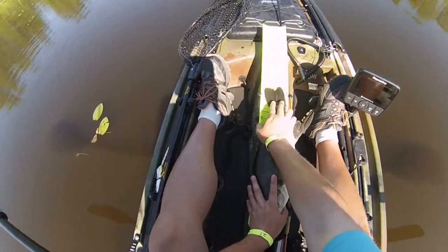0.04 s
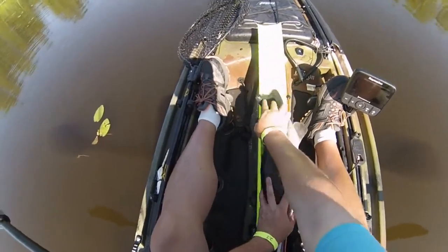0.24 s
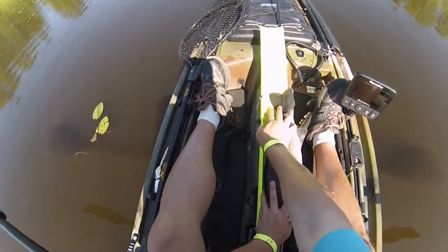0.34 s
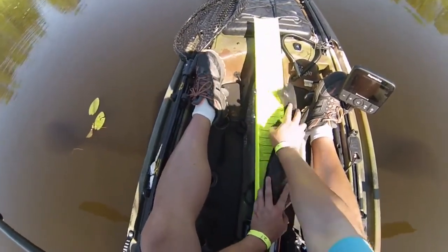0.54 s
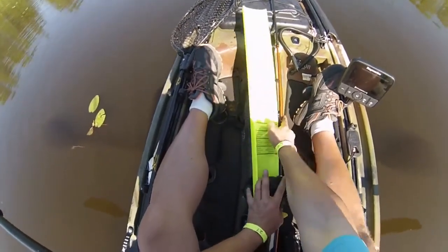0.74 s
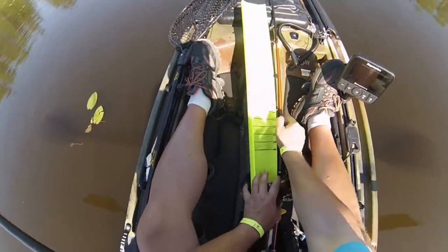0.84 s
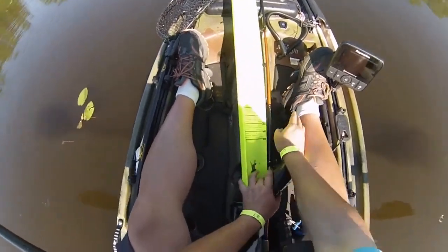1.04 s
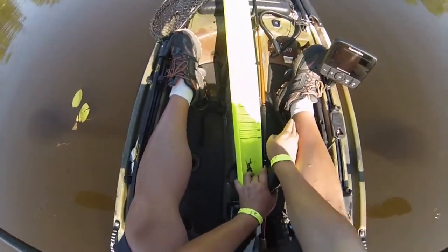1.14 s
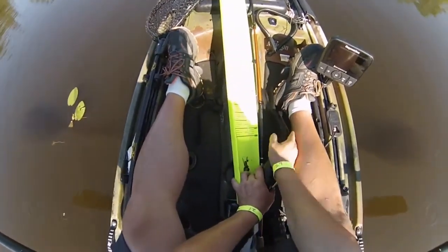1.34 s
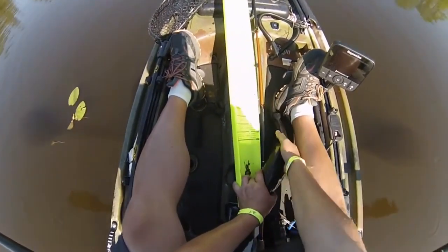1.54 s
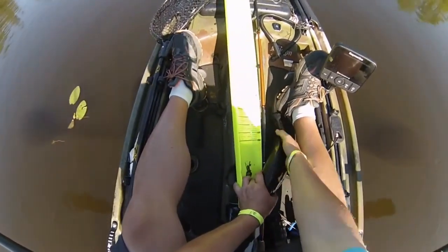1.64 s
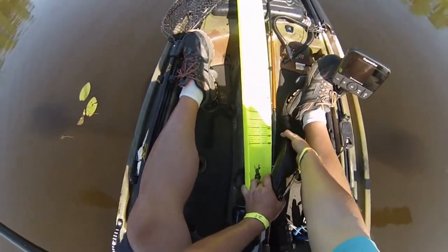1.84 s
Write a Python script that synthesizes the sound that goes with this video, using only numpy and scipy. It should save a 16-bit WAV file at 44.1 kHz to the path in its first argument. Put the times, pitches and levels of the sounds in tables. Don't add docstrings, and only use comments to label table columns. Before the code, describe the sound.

A wet fish flops in two quick bursts on a plastic board, booming a hollow boat hull

```python
import sys
import numpy as np
from scipy import signal
from scipy.fft import rfft, irfft
from scipy.io import wavfile
from scipy.ndimage import uniform_filter1d

SR = 44100
rng = np.random.default_rng(int(sys.argv[2]) if len(sys.argv) > 2 else 0)


def materialize(psi):
    bounded = np.clip(np.atleast_2d(psi).T, -1, 1)
    quanta = np.round(bounded * 32767).astype(np.int16)
    wavfile.write(sys.argv[1], SR, quanta)


def level_to_linear(level):
    exponent = np.asarray(level, float) / 20
    return 10 ** exponent


N = 83790

# (frequency [Hz], level [dB])
AIR_SPECTRUM = [(15, -46), (25, -23), (101, 2), (178, -14.5), (313, -10), (378, -30), (1800, -30.5),
                (10900, -36), (15500, -37.5)]
# (frequency [Hz], level [dB], width [Hz])
ENGINE_TONES = [(49.5, -64, 8.5), (97.9, -67.5, 9.1)]
# (time [s], level [dB])
EFFORT_CURVE = [(0, -77), (0.121, -67.5), (.21, -57), (0.269, -44.5), (0.422, -64), (0.558, -59),
                (0.617, -72.5), (0.698, -50), (0.797, -42.5), (0.871, -56), (0.971, -60.5), (1.12, -64.5),
                (1.22, -71), (1.481, -67.5), (1.9, -76)]
# (frequency [Hz], gain [dB])
HULL_MODES = [(65, -1), (100, 8.5), (130, -9.5), (175, -8), (225, 6.5), (270, -7.5), (310, 10), (398, 6.5),
              (512, 2), (700, -1.5)]
# (time [s], peak [dB], boom [Hz], knock re peak [dB])
BODY_BLOWS = [(0.134, -55.5, 140, -38), (0.194, -52.5, 158, -11), (0.2529, -32.5, 296, -23),
              (0.259, -36, 101, 9), (0.287, -41.5, 137, -30), (0.326, -43.5, 73, -1),
              (0.347, -44.5, 169, -1.5), (0.377, -43.5, 62.5, 0), (0.414, -42, 137, -2),
              (0.447, -48, 91, 3.5), (0.456, -41, 148, -17), (0.506, -48.5, 127, -5), (0.544, -54, 70, -2),
              (0.64, -41, 95, -8), (0.651, -48.5, 166, -4.5), (0.66, -44.5, 135, -4),
              (0.692, -32.5, 181, -11), (0.735, -31.5, 187, -6), (0.746, -38, 235, 10),
              (0.751, -26.5, 128.4, -2.5), (0.7982, -22, 212.6, -6), (0.8116, -29, 244, -6),
              (0.827, -31, 153, -7.5), (0.879, -46.5, 97, 7.5), (0.904, -39.5, 149, -12),
              (0.94, -41.5, 142, -3), (1.002, -49, 154, -24), (1.033, -48, 147, -9.5),
              (1.086, -57, 167, 6.5), (1.166, -55.5, 160, -11), (1.257, -53.5, 214, 2),
              (1.454, -48, 165, 1), (1.549, -53.5, 178, -30.5), (1.707, -56.5, 170, 8),
              (1.84, -49.5, 199, -6)]
# (frequency [Hz], gain [dB])
BOARD_MODES = [(1195, 11.5), (1660, 6), (2000, 7.5), (2250, 7), (2490, 7.5), (2700, -0.5), (3050, -2.5),
               (3700, 0), (4400, -5), (4900, 4)]
# (time [s], peak [dB], brightest [Hz], contact [ms], hiss re peak [dB])
MORE_SLAPS = [(0.1716, -61, 2500, 5.5, -5), (0.189, -69.5, 4000, 8, 17), (0.2146, -54.5, 1660, 21, -21),
              (0.346, -47, 1110, 9.5, -35), (0.5841, -57, 3380, 12, -9), (0.5944, -57.5, 3000, 10, -3),
              (0.6062, -51, 3540, 22, -12), (0.636, -45, 1150, 4.2, -7), (0.6513, -48, 4950, 14.6, -37.5),
              (0.6883, -54, 2000, 7.4, -13), (0.7111, -41, 2440, 30, -26), (0.8524, -74, 3500, 6.8, -22),
              (0.877, -58, 1000, 4.7, -25), (0.9448, -50, 1020, 4.2, -9), (1.0574, -56, 1080, 8.5, -1),
              (1.1025, -51.5, 5340, 10.4, -4), (1.1373, -68, 1280, 8.6, 6), (1.258, -57, 1043, 7.5, -38),
              (1.4558, -56.5, 1050, 8, -7)]
# (time [s], peak [dB], brightest [Hz], contact [ms], hiss re peak [dB])
HARD_SLAPS = [(0.2238, -32, 1600, 32, -6.5), (0.2374, -30.5, 1650, 9.5, -20),
              (0.247, -18, 1780, 5.7, -17.5), (0.2497, -15, 1970, 4.8, -9.5), (0.2535, -21, 2250, 5, -12),
              (0.265, -32, 2600, 8, -12), (0.273, -29.5, 1970, 2.9, -17), (0.3064, -39, 2000, 2.3, -10),
              (0.3166, -37, 1900, 1.9, -11.5), (0.3226, -35.5, 2400, 7.4, -38),
              (0.3885, -40.5, 1700, 8.7, -20), (0.399, -44, 1470, 6, -30), (0.409, -48, 1660, 13.4, -30),
              (0.427, -54.5, 1900, 16, -34), (0.443, -40, 1780, 25, -16), (0.4472, -40.5, 1450, 7.4, -27),
              (0.5055, -43.5, 1650, 24, -26), (0.5345, -36, 2210, 2, -15), (0.543, -46, 2280, 12, -38),
              (0.724, -41, 3070, 9.4, -28), (0.7333, -24, 2860, 6.8, -4), (0.7385, -28, 2580, 5.4, 0.5),
              (0.75, -36, 2760, 14, -38), (0.7642, -29.5, 1920, 6.7, -28), (0.7772, -29.5, 3530, 6.3, -5.5),
              (0.783, -36, 3580, 5.9, -17), (0.8167, -39.5, 1200, 19.7, -26)]
# (time [s], peak [dB], pitch [Hz], scratch [ms])
FIN_RAPS = [(0.249, -23.5, 1150, 20), (0.2484, -22, 1737, 20), (0.2515, -21.5, 3790, 9.6),
            (0.252, -24, 6100, 7.4), (0.2545, -27.5, 2050, 16), (0.2735, -37, 5100, 18),
            (0.276, -37, 1970, 28), (0.289, -44.5, 2030, 28), (0.307, -49, 4100, 14),
            (0.31, -42.5, 1960, 54), (0.323, -42, 4070, 16), (0.323, -47, 2430, 38), (0.389, -58, 5000, 22),
            (0.3995, -49.5, 2000, 26), (0.447, -45, 1700, 73), (0.446, -53.5, 4040, 27),
            (0.452, -44.5, 520, 43), (0.535, -54.5, 4150, 13), (0.5347, -42.5, 2400, 35),
            (0.5845, -53.5, 3380, 34), (0.593, -54.5, 3840, 38), (0.5962, -49.5, 1970, 19.5),
            (0.606, -51.5, 3840, 19), (0.6535, -72, 4800, 10), (0.735, -25, 2730, 9.9),
            (0.7389, -29.5, 6250, 10), (0.751, -38.5, 2900, 9.8), (0.766, -47.5, 4870, 22),
            (0.7769, -30.5, 4030, 6), (0.777, -34, 2000, 8.3), (0.7795, -33, 5300, 14),
            (0.8335, -46.5, 3400, 15), (1.102, -58, 1950, 25), (1.449, -61, 5000, 8.7)]
# (start [s], length [s], from [Hz], to [Hz], level [dB])
WHISTLES = [(0.674, 0.039, 2920, 2480, -68.5), (0.80, 0.05, 3597, 3440, -72),
            (0.843, 0.047, 3460, 3346, -67), (0.89, 0.024, 3360, 3180, -76), (0.9, 0.019, 2333, 2910, -78),
            (0.919, 0.029, 2870, 2980, -65), (0.92, 0.16, 3390, 3440, -83), (1.249, 0.028, 7510, 7740, -90),
            (1.455, 0.028, 5450, 4700, -70.5), (1.482, .011, 4853, 5500, -67),
            (1.501, 0.012, 7060, 7070, -75), (1.52, .02, 6870, 4700, -71.5),
            (1.541, 0.051, 4420, 4495, -68.5), (1.471, 0.18, 2880, 2863, -85),
            (1.664, .022, 5200, 5360, -79), (1.682, 0.024, 5320, 4230, -71.5),
            (1.737, 0.033, 4660, 5680, -70.5), (1.816, 0.045, 8130, 6130, -81.5),
            (1.847, 0.017, 6040, 6000, -81)]
# (start [s], length [s], centre [Hz], width [Hz], level [dB])
TRILL = (1.7, .13, 5700, 2600, -73)

AIR_DB = -72
INSECT_HZ, INSECT_WIDTH_HZ, INSECT_DB = 10850, 900, -87
CLICKS_PER_S, CLICK_SPREAD_DB = 9000, 3.5
RUMBLE_DB, RUSTLE_DB, RUSTLE_HZ = 3.5, -13.5, 1290
HULL_DB, HULL_CYCLES, BOOM_CYCLES, KNOCK_S = -9, 9, 10, 0.0073
BOARD_T60_S, DETUNE_RATIO, COLOUR_DB = 0.024, 0.015, 6
RING_DB, CRACK_DB, CRACK_LOW_HZ = -3.5, -6, 980
HISS_HZ, SPRAY_DB, SPRAY_S = 5500, -11, 0.0089
RAP_T60_S = 0.009
ECHO_DB, ECHO_T60_S = -8, 0.55
TOP_HZ = 15300


def unit(x):
    return x / np.sqrt(np.mean(x ** 2) + 1e-30)


def peak1(x):
    return x / abs(x).max()


def mode(x, hz, t60_s):
    decay = np.log(1000) / (max(t60_s, 0.002) * SR)
    pole = np.exp(2j * np.pi * hz / SR - decay)
    return signal.lfilter([1], [1, -pole], x).imag


def band(x, hz, width_hz):
    return signal.lfilter(*signal.iirpeak(hz, hz / max(width_hz, 1), fs=SR), x)


def band2(x, hz, width_hz):
    return band(band(x, hz, width_hz), hz, width_hz)


def highpass(x, hz):
    return signal.sosfilt(signal.butter(2, hz, "high", fs=SR, output="sos"), x)


def colour(x, spectrum):
    hz, db = np.array(spectrum).T
    grid_hz = np.maximum(np.arange(len(x) // 2 + 1) * SR / len(x), 1)
    gain = level_to_linear(np.interp(np.log(grid_hz), np.log(hz), db))
    return irfft(rfft(x) * gain, len(x))


def walk(rate_hz):
    k = int(SR / rate_hz)
    return unit(uniform_filter1d(uniform_filter1d(rng.standard_normal(N), k), k))


def clicks(count):
    chance, side, size = rng.random((count, 3)).T
    gate = np.clip((CLICKS_PER_S / SR - chance) * SR / 500, 0, 1)
    return unit(gate * np.sign(side - 0.5) * level_to_linear(-CLICK_SPREAD_DB * np.log(size + 0.01)))


def add(out, x, start_s):
    i = max(int(start_s * SR), 0)
    out[i:i + len(x)] += x[:N - i]


def background():
    air = colour(rng.standard_normal(N), AIR_SPECTRUM)
    reference = np.std(highpass(air, 130))
    top = highpass(air, 1500)
    air = ((air - top) * level_to_linear(2.5 * walk(22)) + top * level_to_linear(1.2 * walk(25))) / reference
    t = np.arange(N) / SR
    engine = np.zeros(N)
    for hz, db, width_hz in ENGINE_TONES:
        level = level_to_linear(db + 0.62 * walk(width_hz)) * np.sqrt(2)
        engine += level * np.sin(2 * np.pi * (hz * t + 0.06 * walk(width_hz)))
    insects = unit(band2(rng.standard_normal(N), INSECT_HZ, INSECT_WIDTH_HZ))
    return level_to_linear(AIR_DB) * air + engine + level_to_linear(INSECT_DB + 1.2 * walk(20)) * insects


def hull(x, shake, low_hz=0):
    out = np.zeros(len(x))
    for drive, (hz, db) in zip(shake, HULL_MODES):
        if hz > low_hz:
            out += drive * level_to_linear(db) * mode(x, hz, HULL_CYCLES / hz)
    return out


def struggle():
    time_s, db = np.array(EFFORT_CURVE).T
    effort = level_to_linear(np.interp(np.arange(N) / SR, time_s, db))
    jolts = rng.standard_normal(N) * level_to_linear(2.2 * walk(71))
    rumble = unit(hull(jolts, np.ones(len(HULL_MODES))))
    rubs = clicks(N) * level_to_linear(1.6 * np.tanh(walk(60)))
    rustle = unit(band(rubs, RUSTLE_HZ, 2500))
    return effort * (level_to_linear(RUMBLE_DB) * rumble + level_to_linear(RUSTLE_DB) * rustle)


def thumps():
    out, t = np.zeros(N), np.arange(12000) / SR
    shakes = level_to_linear(3 * rng.standard_normal((50, len(HULL_MODES))))
    noises = rng.standard_normal((50, len(t)))
    for (time_s, db, hz, knock_db), shake, noise in zip(BODY_BLOWS, shakes, noises):
        push = np.gradient(np.sin(np.pi * np.clip(t * hz * 1.71, 0, 1)) ** 2)
        boom = peak1(band(mode(push, hz, BOOM_CYCLES / hz), hz, 2 * hz))
        boom += level_to_linear(HULL_DB) * peak1(hull(push, shake, low_hz=0.7 * hz))
        rough = band(noise * np.exp(-t / KNOCK_S), 450, 1400)
        knock = peak1(hull(rough, shake, low_hz=250))
        add(out, level_to_linear(db) * (boom + level_to_linear(knock_db) * knock), time_s)
    return out


def slaps(table):
    out, t = np.zeros(N), np.arange(5000) / SR
    grains = clicks(N + len(t))
    tunes = 1 + DETUNE_RATIO * rng.standard_normal((40, len(BOARD_MODES)))
    thin = signal.butter(2, CRACK_LOW_HZ, "high", fs=SR)
    for (time_s, db, bright_hz, contact_ms, hiss_db), tune in zip(table, tunes):
        start_s = time_s - 0.001 - contact_ms / 8000
        u = t / (max(contact_ms, 1) / 5000)
        grain = grains[int(start_s * SR):][:len(t)]
        contact = grain * u ** 2 * np.exp(2 - u) / 4
        spray = grain * np.exp(-t / SPRAY_S) * (1 - np.exp(-u)) ** 2
        shower = contact + level_to_linear(SPRAY_DB) * spray

        ring = np.zeros(len(t))
        for k, (hz, gain_db) in zip(tune, BOARD_MODES):
            gain = level_to_linear(gain_db - COLOUR_DB * np.log2(hz / bright_hz) ** 2)
            ring += gain * mode(contact, hz * k, BOARD_T60_S)
        crack = band(band2(shower, 1.02 * bright_hz, 2800), 3300, 5000)
        crack = signal.lfilter(*thin, crack)
        hiss = band(band(shower * (1 - np.exp(-u / 2)), HISS_HZ, 4800), HISS_HZ, 9800)
        mix = level_to_linear(RING_DB) * peak1(ring) + level_to_linear(CRACK_DB) * peak1(crack) + level_to_linear(hiss_db) * peak1(hiss)
        add(out, level_to_linear(db) * mix, start_s)
    return out


def raps():
    out, t = np.zeros(N), np.arange(3000) / SR
    grits = rng.standard_normal((40, len(t)))
    for (time_s, db, hz, scratch_ms), grit in zip(FIN_RAPS, grits):
        u = t * 12000 / max(scratch_ms, 2)
        scratch = band(grit * u * np.exp(-u), hz, hz)
        ring = mode(scratch, hz, RAP_T60_S * 2500 / hz)
        ring += 0.7 * mode(scratch, 1.12 * hz, RAP_T60_S / 2)
        add(out, level_to_linear(db) * peak1(ring), time_s - 0.001)
    return out


def birds():
    out = np.zeros(N)
    for start_s, length_s, from_hz, to_hz, db in WHISTLES:
        u = np.linspace(0, 1, int(length_s * SR))
        hz = from_hz + (to_hz - from_hz) * (u - 0.1 * np.sin(2 * np.pi * u))
        tone = np.sqrt(2) * np.sin(2 * np.pi * np.cumsum(hz) / SR)
        add(out, level_to_linear(db) * np.sin(np.pi * u) ** 0.2 * tone, start_s)
    out = out * level_to_linear(2.2 * walk(200))
    t = np.arange(SR // 2) / SR
    tail = rng.standard_normal(len(t)) * np.exp(-np.log(1000) * t / ECHO_T60_S)
    echo = signal.fftconvolve(out, tail / np.sqrt(np.sum(tail ** 2)))[:N]
    return out + level_to_linear(ECHO_DB) * echo


def trill():
    start_s, length_s, hz, width_hz, db = TRILL
    u = np.clip((np.arange(N) / SR - start_s) / length_s, 0, 1)
    rasp = band2(rng.standard_normal(N) * level_to_linear(walk(120)), hz, width_hz)
    return level_to_linear(db) * np.sin(np.pi * u ** 0.52) * unit(rasp)


def scene():
    mix = background() + birds() + struggle() + thumps()
    mix = mix + slaps(HARD_SLAPS) + slaps(MORE_SLAPS) + raps() + trill()
    return mix[None, :]


def top_cut(x):
    return signal.sosfilt(signal.butter(12, 15780, fs=SR, output="sos"), x)


def record(dry):
    x = highpass(dry, 28)
    x = signal.sosfilt(signal.ellip(8, 0.2, 70, TOP_HZ, fs=SR, output="sos"), x)
    return top_cut(x)


dry = scene()
out = record(dry)
materialize(out)
```